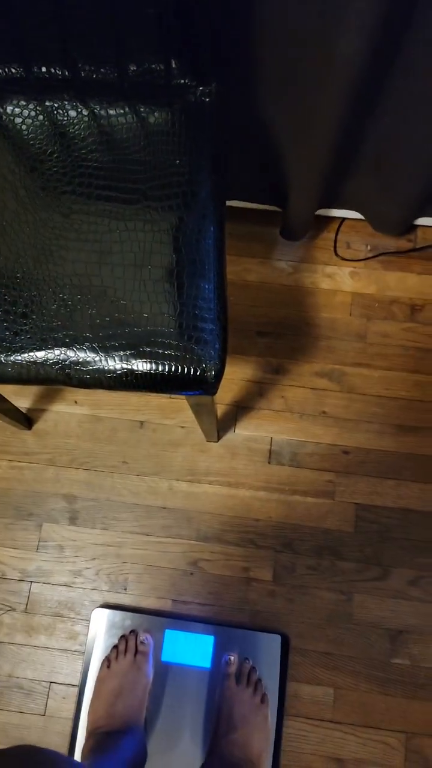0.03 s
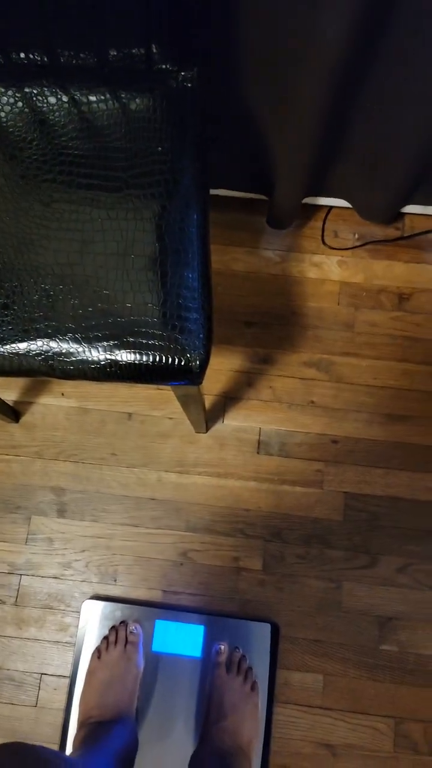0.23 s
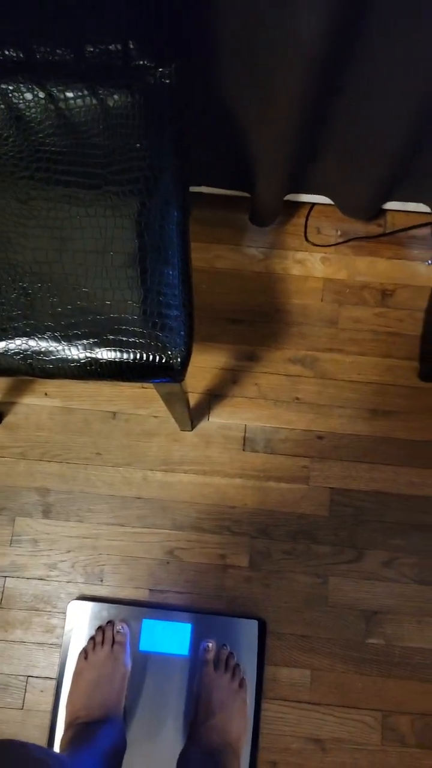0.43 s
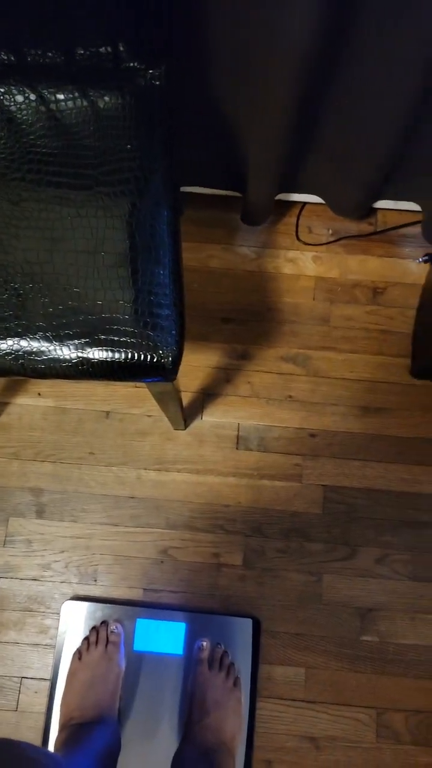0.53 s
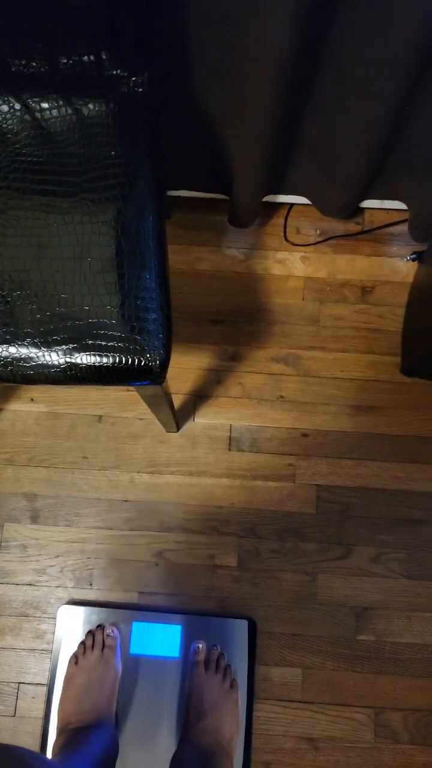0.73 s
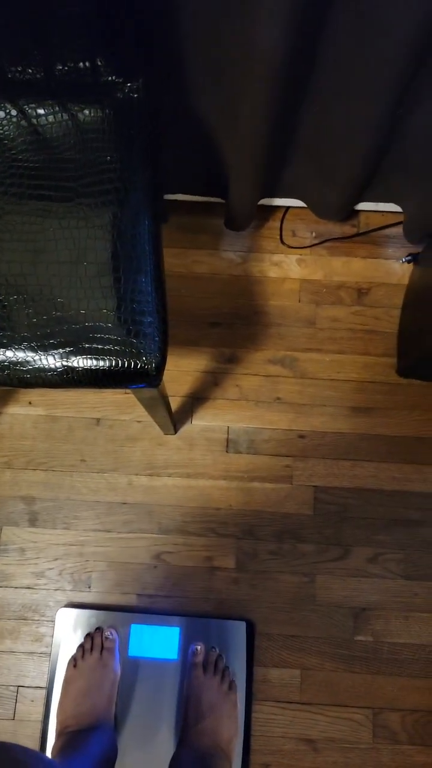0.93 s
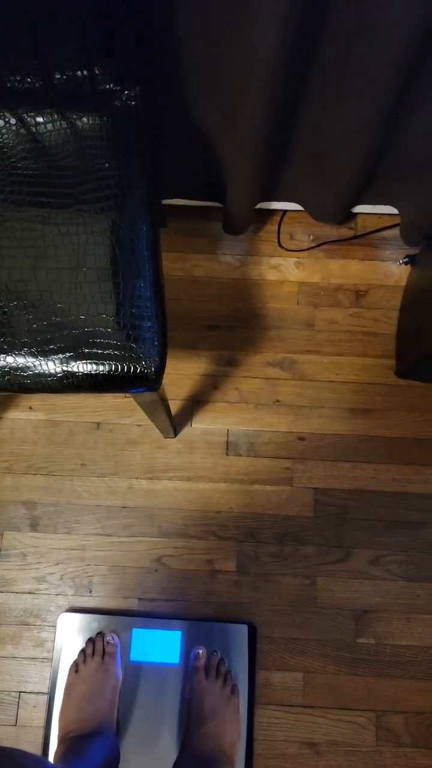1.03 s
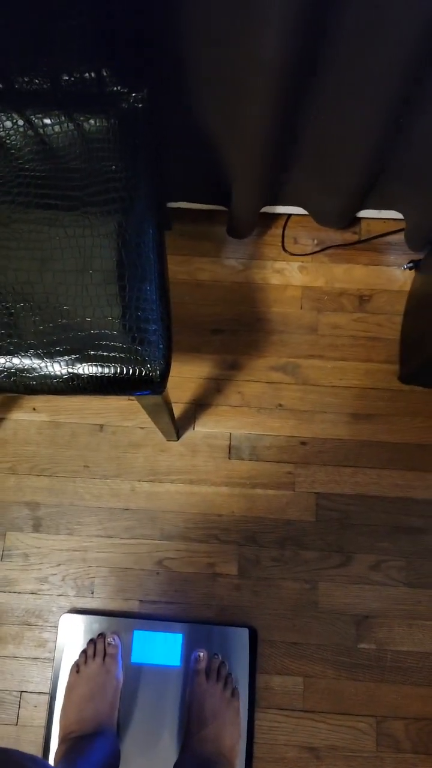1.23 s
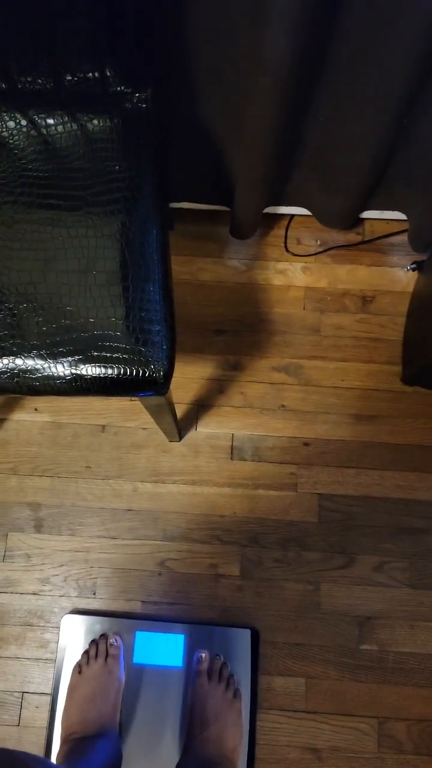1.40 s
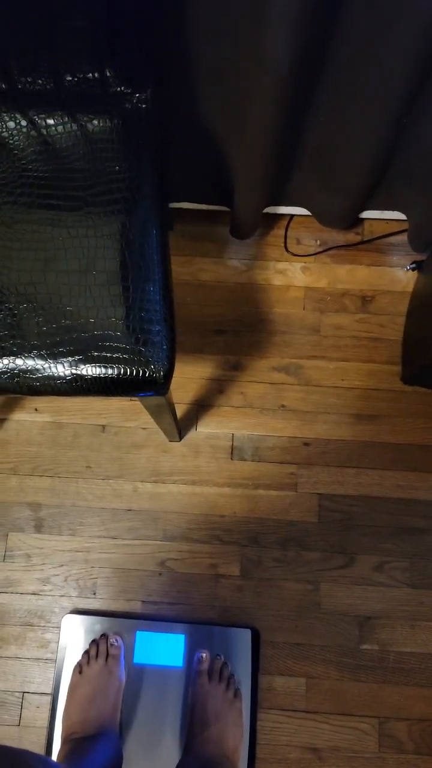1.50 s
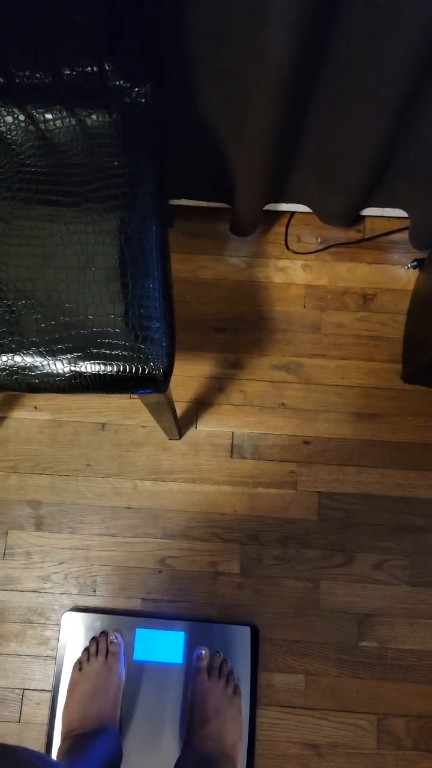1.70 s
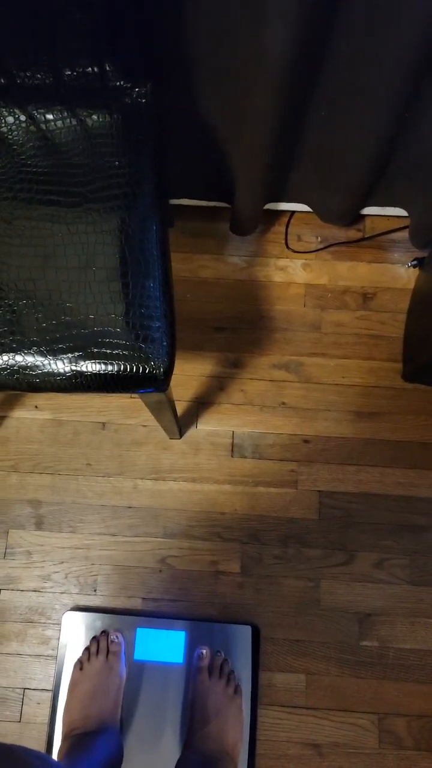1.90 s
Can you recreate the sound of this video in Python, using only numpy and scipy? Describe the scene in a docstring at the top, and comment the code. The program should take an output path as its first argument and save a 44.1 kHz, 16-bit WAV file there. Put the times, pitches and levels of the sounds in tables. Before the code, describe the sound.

One sharp knock from a bathroom scale underfoot, then soft scuffing and rustling.

```python
"""A small room with a wooden floor, heard from a phone held above a bathroom scale as someone settles on it.
The platform knocks down once, rattles on its feet and thumps the boards; the room rings briefly.
Then a foot scuffs, weight shifts, clothes rustle and the load draws a creak and a squeak.
Underneath lies a bed of room noise, mains hum, faint hiss and a low wavering drone."""
import sys
import numpy as np
from scipy import signal
from scipy.fft import rfft, irfft
from scipy.io import wavfile
from scipy.ndimage import uniform_filter1d

SR = 44100
rng = np.random.default_rng(int(sys.argv[2]) if len(sys.argv) > 2 else 0)


def store_wav(level_fs):
    """Save 16-bit WAV to argv[1]."""
    pcm = np.round(np.clip(np.atleast_2d(level_fs), -1, 1) * 32767)
    wavfile.write(sys.argv[1], SR, pcm.T.astype(np.int16))


N = 85995
T = np.arange(N) / SR
BIN_HZ = np.fft.rfftfreq(N, 1 / SR)


def amp(db):
    """Decibels to gain."""
    return 10 ** (np.asarray(db) / 20)


def pan(db):
    """Stereo gains that put the left channel db above the right."""
    return amp(np.array([[db], [-db]]) / 2)


def ride(rows):
    """A fader ride: straight lines through (time, level) rows."""
    return np.interp(T, *np.array(rows).T)


def across(rows, hz):
    """Read a table's second column on a log-frequency axis."""
    rows = np.array(rows)
    return np.interp(np.log(np.maximum(hz, 1)), np.log(rows[:, 0]), rows[:, 1])


def drift(rate_hz):
    """Smooth random modulation with a spread of 1."""
    step = max(int(SR / rate_hz), 2)
    stairs = np.repeat(rng.standard_normal(N // step + 1), step)
    smooth = uniform_filter1d(uniform_filter1d(stairs, step), step)[:N]
    return smooth / smooth.std()


def fade(age, t60):
    """Full level until age 0, then a tail that falls 60 dB in t60 seconds."""
    return np.exp(-np.log(1000) * np.maximum(age, 0) / t60)


def envelope(start, attack, hold, t60):
    """A smooth attack, a hold and an exponential tail."""
    age = T - start
    rise = np.sin(np.pi / 2 * np.clip(age / attack, 0, 1)) ** 2
    return rise * fade(age - attack - hold, t60)


def tone(hz, wander, rate_hz):
    """A sine of rms 1 whose pitch drifts by the fraction wander."""
    pitch = hz * (1 + wander * drift(rate_hz))
    return np.sqrt(2) * np.sin(2 * np.pi * np.cumsum(pitch) / SR)


# stereo image of the noise layers: f/Hz, left-right correlation
STEREO_IMAGE = [(50, 1), (150, 1), (290, -0.23), (550, .1), (1200, -0.58), (2400, -0.38), (4500, .1),
                (15000, -0.42)]

def noise(eq, grain=1):
    """Stereo noise of rms 1, textured by grain and then equalised; centred in the bass, wide above."""
    correlation = np.clip(across(STEREO_IMAGE, BIN_HZ), -.99, .99)
    spectrum = rfft(grain * rng.standard_normal((2, N))) * amp(across(eq, BIN_HZ))
    mid, side = spectrum * np.sqrt([1 + correlation, 1 - correlation])
    stereo = irfft([mid + side, mid - side], N)
    return stereo / stereo.std()


# EQ of the dark room noise and of the hiss: f/Hz, relative level/dB
AIR_EQ = [(15, -14), (27, -2.5), (38, -11), (55, -4), (90, -1), (160, -4), (260, 2), (400, -11), (800, -16),
          (1600, -25.5), (3300, -39), (6000, -46.5), (10000, -49.5), (13500, -44.5), (16000, -46)]
HISS_EQ = [(1000, -9), (3000, 12.5), (6000, -7), (10000, -5.5), (13500, -2.5), (16000, -11)]
# fader rides of room noise, hum fundamental and hiss: t/s, level/dB
AIR_RIDE = [(0, -57.5), (.45, -56.5), (.8, -59.5), (1.2, -61), (1.5, -60.5), (1.95, -62.5)]
HUM_RIDE = [(0, -74), (.45, -68), (.6, -63), (.72, -71), (.9, -61), (1.1, -68), (1.28, -61), (1.55, -69.5),
            (1.8, -63), (1.95, -79)]
HISS_RIDE = [(0, -84), (.5, -84), (.7, -77), (.95, -83.5), (1.12, -79), (1.42, -94.5), (1.49, -83),
             (1.66, -96), (1.95, -93)]

def room_tone():
    """The bed: flickering room noise, swelling mains hum with a steady octave, and faint hiss."""
    flicker_db, mains_hz, octave_db = 1.56, 60.4, -70.5
    air = noise(AIR_EQ) * amp(ride(AIR_RIDE) + flicker_db * drift(rate_hz=14))
    hum = amp(ride(HUM_RIDE)) * tone(mains_hz, wander=.014, rate_hz=8)
    octave = amp(octave_db) * tone(2 * mains_hz, wander=.004, rate_hz=12)
    hiss = noise(HISS_EQ) * amp(ride(HISS_RIDE))
    return pan(-4) * (air + hum + octave + hiss)


# swells of the drone: t/s, level/dB before the trim
DRONE_RIDE = [(0, -68), (.19, -63), (.32, -58), (.362, -52), (.39, -58), (.49, -60), (.52, -48),
              (.672, -49), (.726, -65), (.84, -49), (.938, -56.5), (.982, -47.5), (1.128, -59.5),
              (1.216, -52.5), (1.248, -66), (1.29, -49.5), (1.35, -56), (1.482, -62), (1.8, -64),
              (1.95, -71)]

def drone():
    """One low tone that wavers in level and slightly in pitch."""
    trim_db = -2
    return pan(-3.5) * amp(ride(DRONE_RIDE) + trim_db) * tone(248, wander=.0057, rate_hz=14)


# cues for foot scuffs, a soft weight shift, cloth rustles, a dry creak and a short, rough squeak:
# t/s, level/dB, attack/s, hold/s, t60/s
SCUFF_CUES = [(.524, -70, .005, .04, .25), (.580, -59, .014, .008, .12), (.602, -49, .002, .014, .17)]
SHIFT_CUES = [(.556, -52.5, 0.0011, 0.0055, 0.15)]
RUSTLE_CUES = [(.71, -67.5, 0.02, 0.093, 0.75), (1.01, -70, 0.032, 0.078, 0.37)]
CREAK_CUES = [(1.033, -67, 0.013, 0.02, 0.097)]
SQUEAK_CUES = [(1.131, -72, .003, 0.0051, 0.098)]
# resonances that colour each of them: f/Hz, relative level/dB
SCUFF_EQ = [(300, -15), (800, -12), (1020, 7), (1450, -6.5), (1750, 1), (2350, -8), (3050, 1), (3500, -3.5),
            (4900, -7), (5300, -14), (6000, -11.5), (8500, -19.5), (10500, -27.5), (15500, -23)]
SHIFT_EQ = [(200, -31), (550, 6), (700, -2.5), (900, 10), (1250, 2), (1650, -5), (3000, -19), (8000, -57)]
RUSTLE_EQ = [(150, -21.5), (330, 2.5), (600, 0.5), (1400, -8), (3200, -18), (6500, -29), (15000, -30)]
CREAK_EQ = [(1200, -27), (1600, -5), (1790, 1.5), (2150, -6), (2420, -1), (2600, -3.5), (2800, 1),
            (3150, -22), (3600, -14), (4500, -31), (9000, -36), (15000, -46)]
SQUEAK_EQ = [(1500, -23.5), (2290, -4), (3000, -21), (3380, 1), (3750, -16), (4400, -16), (6000, -32),
             (8000, -18), (9500, -35), (15000, -42)]

def friction(cues, eq):
    """Grainy friction through the resonances of what is rubbed, one burst per cue."""
    grain_db = 2.2
    texture = noise(eq, grain=amp(grain_db * drift(rate_hz=700)))
    bursts = sum(amp(db) * envelope(start, attack, hold, t60) for start, db, attack, hold, t60 in cues)
    return pan(-3.5) * texture * bursts


# bands of the room's answer to the knock: f/Hz, relative level/dB, pan/dB
REVERB_BANDS = [(30, -34.5, -3.5), (65, -16, -3), (120, 0, 1), (224, -1, -5), (340, -2.5, 9.5),
                (666, -8.5, -12.5), (1130, 3, -2), (1700, -5, -4.5), (2520, -6, -4.5), (3640, -9.5, -2.5),
                (3820, -21, -6), (4400, -14, -11.5), (5000, -23.5, 5), (5740, -20, -6), (8200, -31, 1.5),
                (9500, -37, 0.5), (16000, -43, 0)]
# length of its tail: f/Hz, t60/s
REVERB_DECAY = [(100, 0.25), (700, .25), (2500, 0.25), (6000, 0.17), (12000, .18)]

def room_reverb(start):
    """Dense reflections build up, hold while the platform rattles and die away band by band."""
    wash = rfft(noise(REVERB_BANDS))
    centres = [row[0] for row in REVERB_BANDS]
    out = 0
    for weights, (hz, _, pan_db) in zip(np.eye(len(centres)), REVERB_BANDS):
        band_pass = across(list(zip(centres, weights)), BIN_HZ)  # crossfades into its neighbours
        tail = envelope(start, attack=.005, hold=.019, t60=across(REVERB_DECAY, hz))
        out = out + pan(pan_db) * irfft(wash * band_pass, N) * tail
    return amp(-27.5) * out


def floor_thump(start):
    """The floorboards take the load and give one low thump that sags in pitch."""
    start_hz, rest_hz, sag_s, rise_s = 168, 150.4, .011, .023
    age = np.maximum(T - start, 0)
    swell = np.minimum(age / rise_s, 1) * fade(age - rise_s, t60=.12)
    hz = rest_hz + (start_hz - rest_hz) * np.exp(-age / sag_s)
    phase = 2 * np.pi * np.cumsum(hz * (age > 0)) / SR
    return amp(-27) * pan(-2) * swell * np.sin(phase)


# hits of the platform, the knock and then its rattle: t/s, relative level/dB, pan/dB
PLATFORM_HITS = [(.2200, 4.5, 1), (.2230, -11.5, -4), (0.2272, -2, -8), (0.2309, -4, -8),
                 (0.243, -8.5, -3.5), (0.2508, -12.5, -4)]
# its ringing modes: f/Hz, relative level/dB, pan/dB, phase lead of the left channel/rad
PLATFORM_MODES = [(356.6, -6.5, -12, .5), (490.4, 1, -10.5, .8), (786, -14, -11, 0.53),
                  (906, -14.5, -4, 1.6), (942, 0.5, -4, 1.6), (1021, -2, -12, 1.8), (1166, -2, -0.5, 3),
                  (1317, -3.5, -2, 2.2), (1527, -3.5, -10, 2.7), (1880, -12, -2, 3.9), (2152, -7.5, 10, 1),
                  (2380, -6.5, 3, 0.74), (2610, -12.5, -1, 0.92), (3070, -12, 2, 0.91)]
# EQ of each hit's crack: f/Hz, relative level/dB
CRACK_EQ = [(30, -41.5), (100, -21.5), (400, -5), (1200, 6), (2200, -9.5), (4500, -10), (5300, -21),
            (8200, -26), (9500, -38.5), (16000, -37)]

def platform_knock():
    """Each hit cracks and adds its energy to the platform's ringing modes."""
    crack_db, ring_db, attack_s = -26.5, -35, .0006
    crack = noise(CRACK_EQ)
    out, energy = 0, 0
    for start, db, pan_db in PLATFORM_HITS:
        snap = envelope(start, attack_s, hold=0, t60=.039)
        out = out + amp(crack_db + db) * pan(pan_db) * crack * snap
        energy = energy + (amp(db) * envelope(start, attack_s, hold=0, t60=.16)) ** 2
    ring = amp(ring_db) * np.sqrt(2 * energy / energy.max())
    for hz, db, pan_db, lead in PLATFORM_MODES:
        phase = 2 * np.pi * (hz * T + rng.random())
        out = out + amp(db) * pan(pan_db) * ring * np.sin([phase + lead, phase])
    return out


def scene():
    """The mix: the small movements, the earlier knock with its thump and reverb, and the bed."""
    body = friction(SCUFF_CUES, SCUFF_EQ) + friction(SHIFT_CUES, SHIFT_EQ)
    cloth = friction(RUSTLE_CUES, RUSTLE_EQ)
    strain = friction(CREAK_CUES, CREAK_EQ) + friction(SQUEAK_CUES, SQUEAK_EQ)
    knock_s = PLATFORM_HITS[0][0]
    impact = platform_knock() + floor_thump(knock_s) + room_reverb(knock_s)
    return room_tone() + drone() + body + cloth + strain + impact


def record(dry):
    """The phone cuts the top of the treble."""
    top_hz = 15600
    return signal.sosfilt(signal.ellip(10, .2, 70, top_hz, fs=SR, output="sos"), dry)


dry = scene()
out = record(dry)
store_wav(out)
```